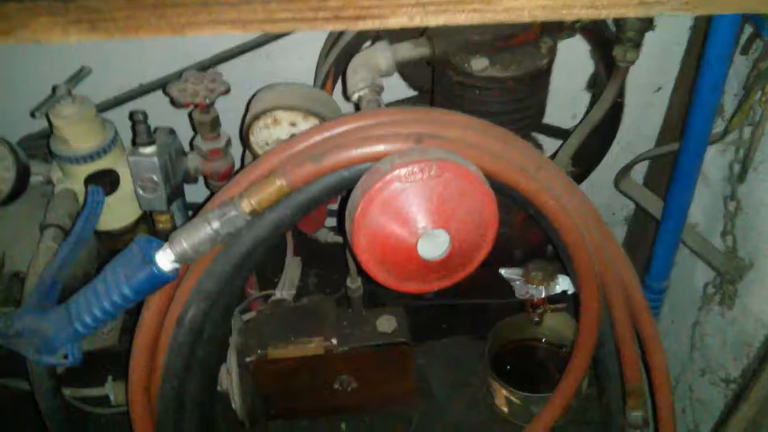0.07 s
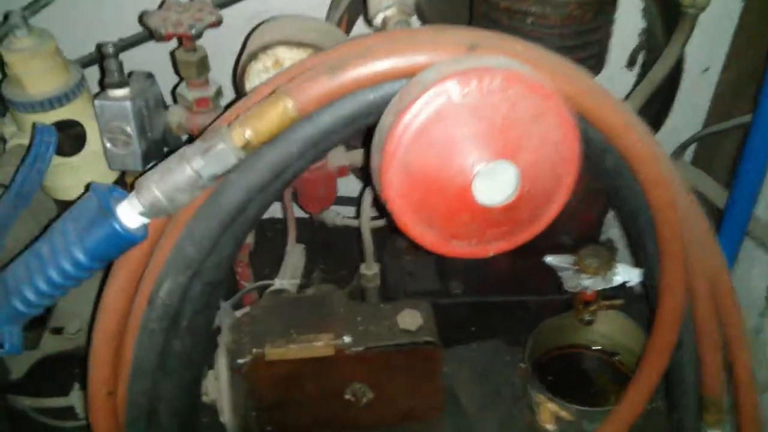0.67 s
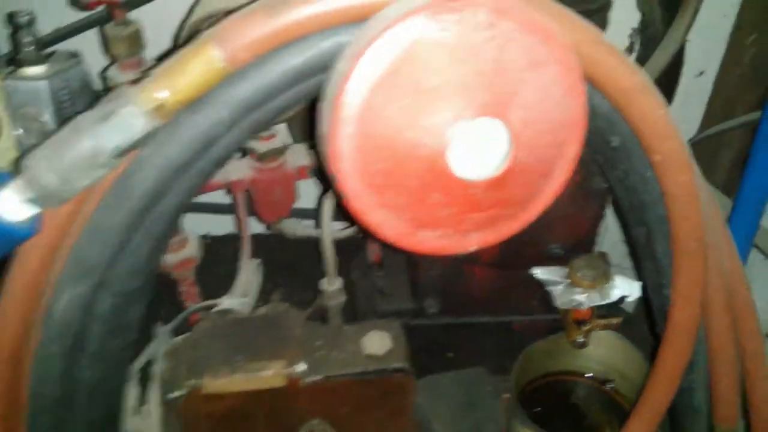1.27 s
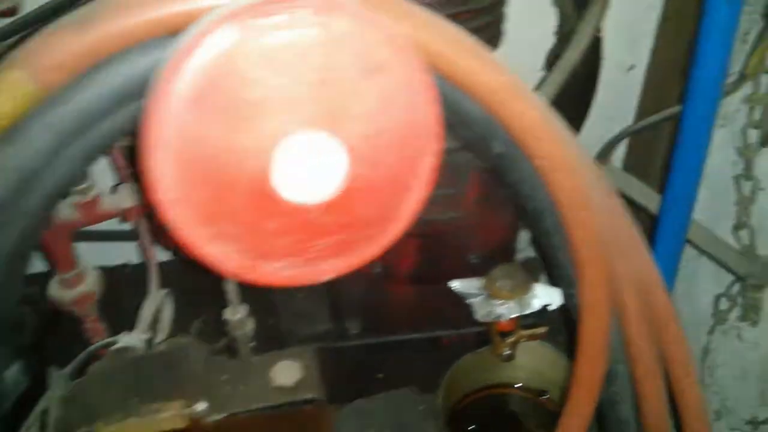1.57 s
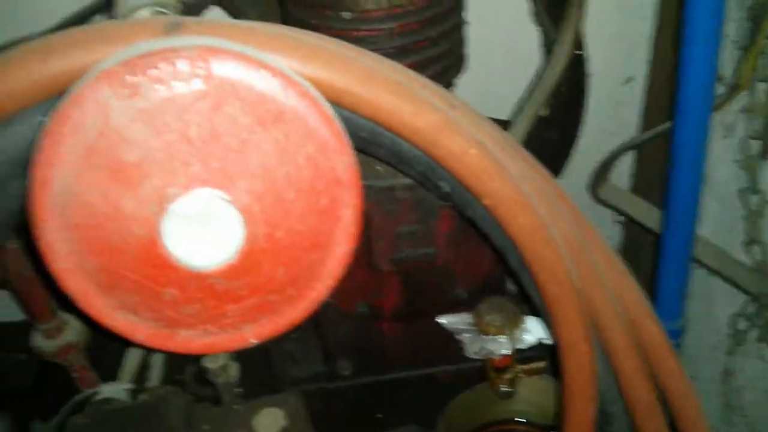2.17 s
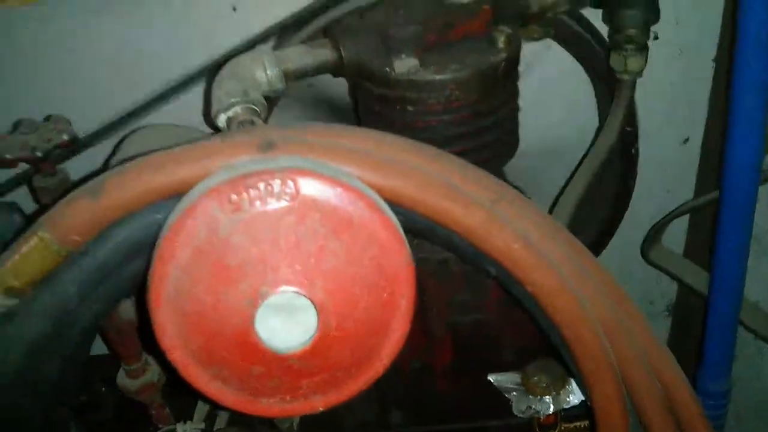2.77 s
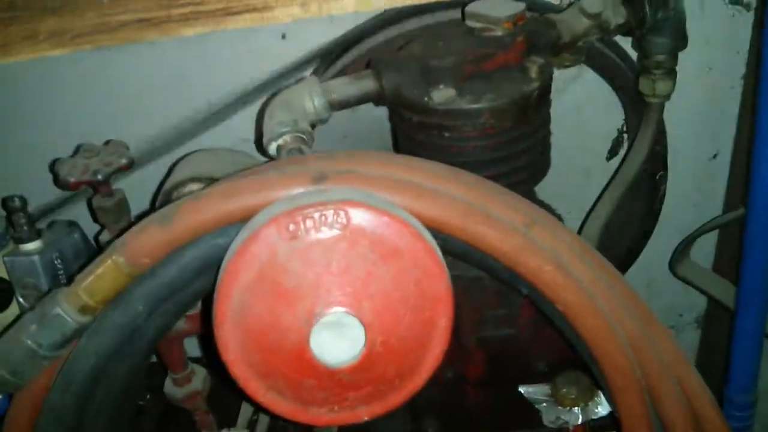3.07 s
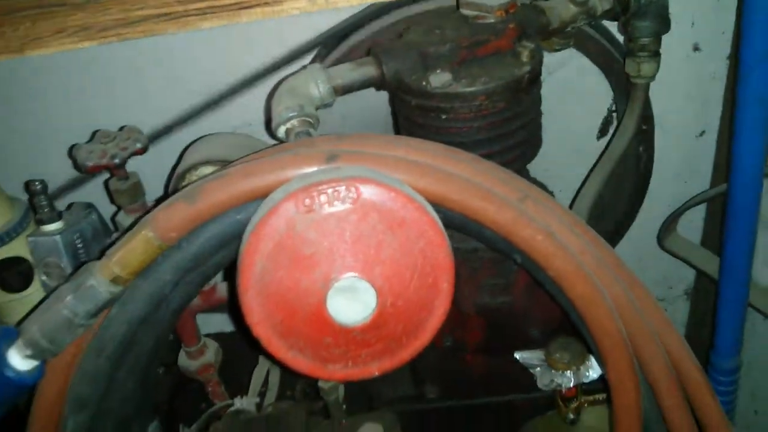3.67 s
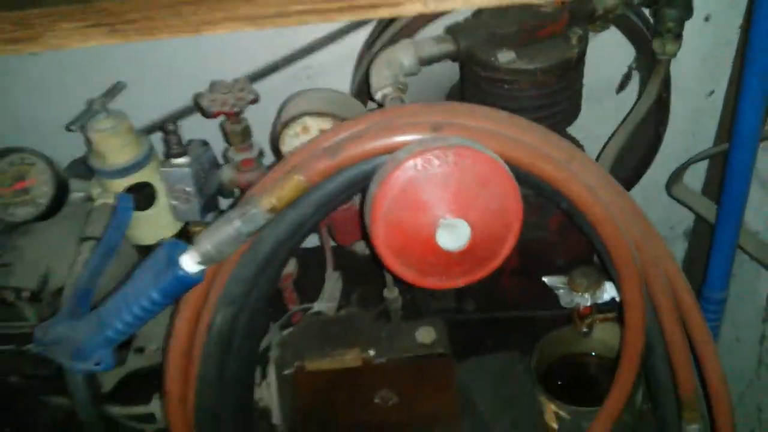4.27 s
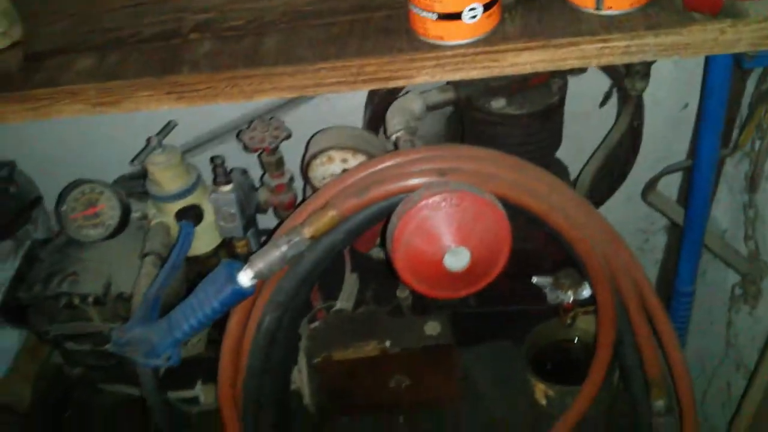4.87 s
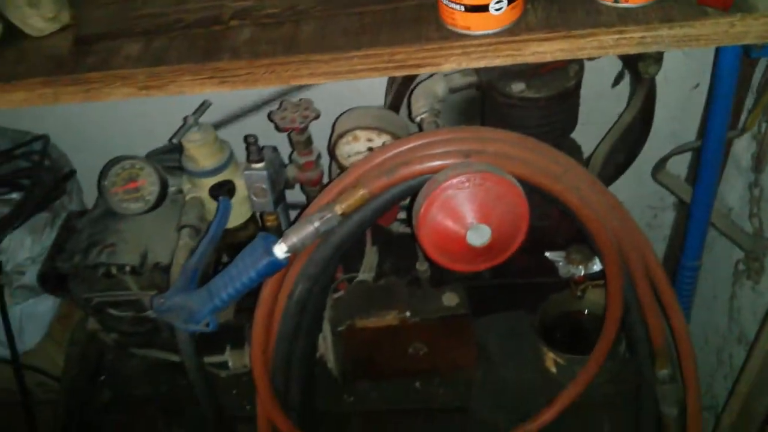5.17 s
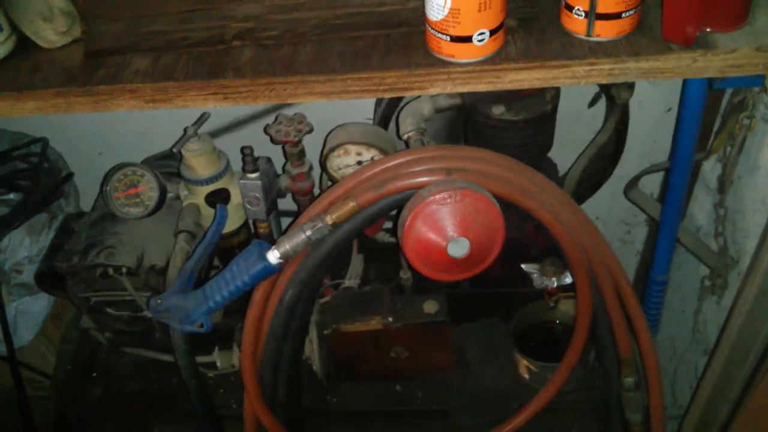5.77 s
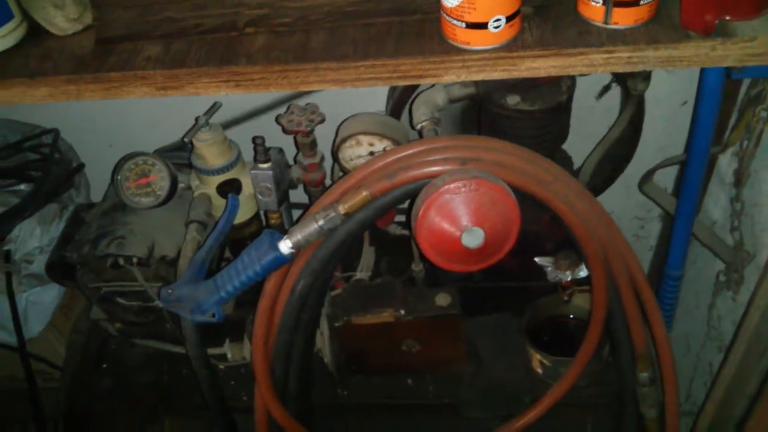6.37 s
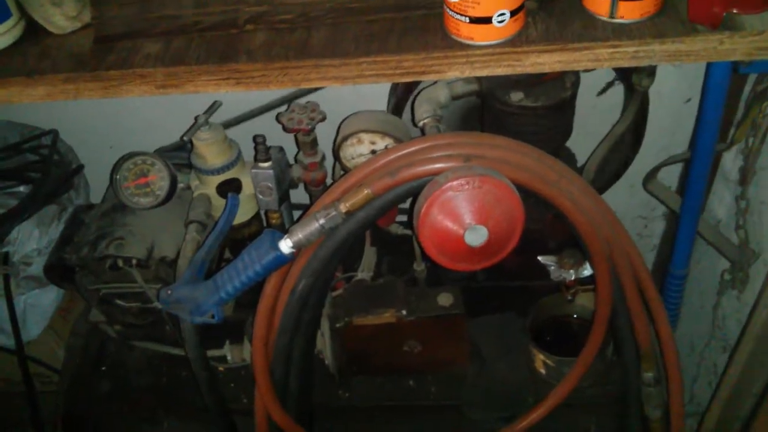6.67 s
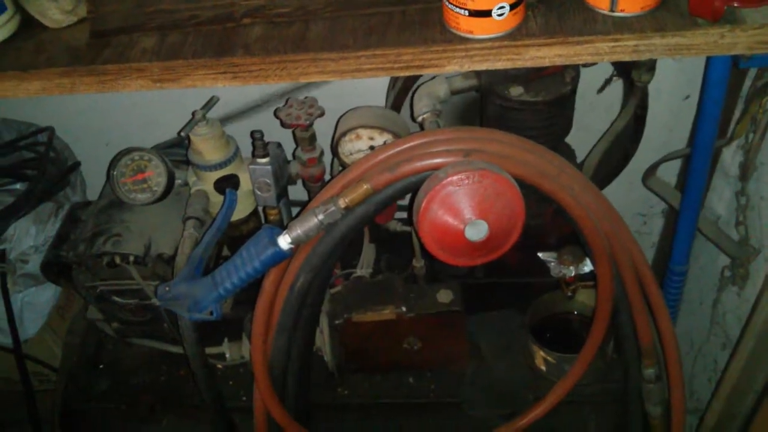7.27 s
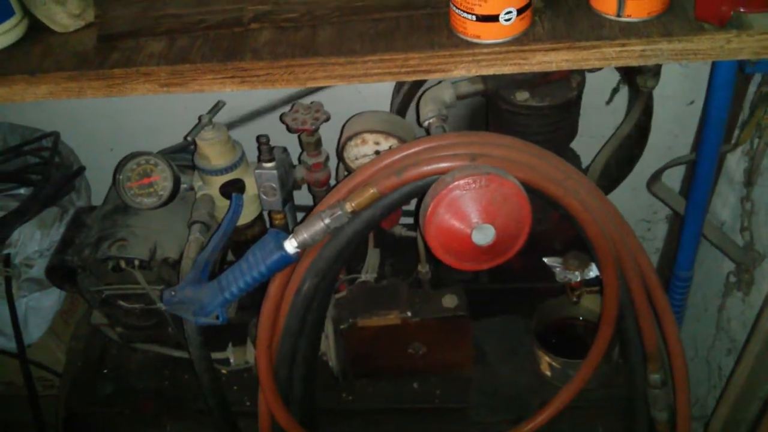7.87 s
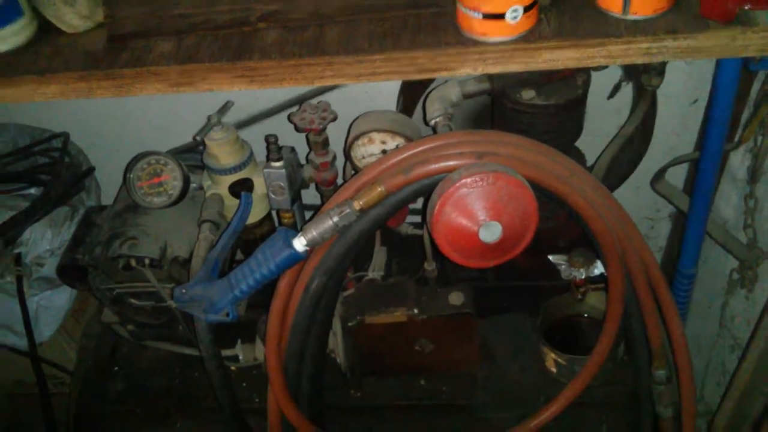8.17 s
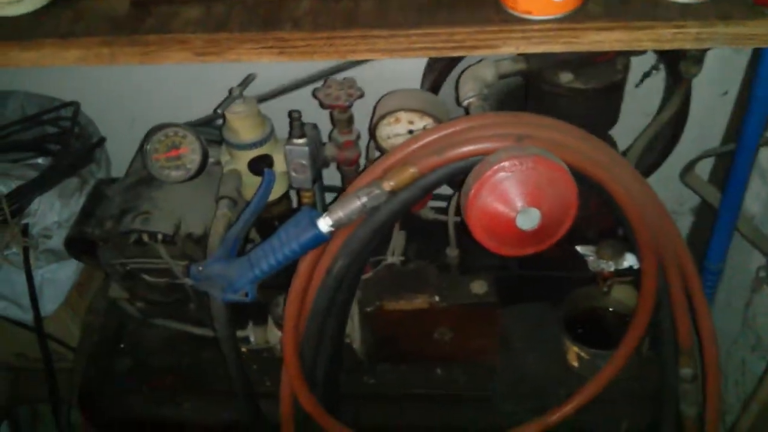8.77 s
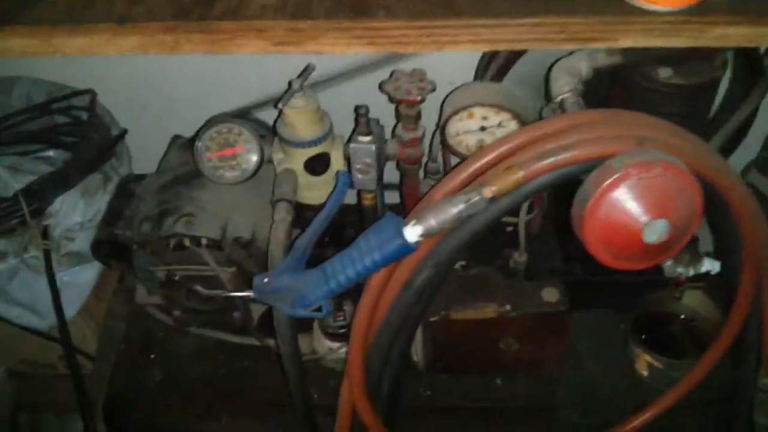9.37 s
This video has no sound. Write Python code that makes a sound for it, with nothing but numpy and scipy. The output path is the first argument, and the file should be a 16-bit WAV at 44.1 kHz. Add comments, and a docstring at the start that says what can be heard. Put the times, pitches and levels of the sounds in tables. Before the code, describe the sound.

An old belt-driven air compressor starts up close by in a small, cluttered workshop. After near quiet with soft ticking come a metallic snap, a straining motor hum, a few jolts and short, high belt squeaks. The machine settles into a loud, pulsing clatter of loose metal, with the pump thumping and hissing eight to nine times a second. It keeps running, a little lighter as the microphone backs away and shifts sideways.

```python
"""An old belt-driven air compressor in a small workshop, the microphone close by, then a step back,
then at the side. Over faint ticking the switch clacks, the motor groans, the slipping belt chirps
and the pump catches. From then on loose metal rattles once a motor turn, while the piston thumps
the tank and the valves slap and hiss eight to nine times a second."""
import sys
import numpy as np
from scipy import signal
from scipy.io import wavfile

SR = 44100
rng = np.random.default_rng(int(sys.argv[2]) if len(sys.argv) > 2 else 0)


def bounce(signal):
    """Save signal as a 16-bit WAV file at the path given by the first command-line argument."""
    frames = np.transpose(np.atleast_2d(signal))
    limited = np.clip(frames, -1, 1)
    pcm = np.round(limited * 32767).astype(np.int16)
    wavfile.write(sys.argv[1], SR, pcm)


N = 419832
T = np.arange(N) / SR
TURN_S, STROKE_S = .034634, .11717  # one motor turn and one pump stroke at full speed
SKIP_AT_S, SKIP_S = 5.4, .0232  # the whole rhythm skips ahead once: when, and by how much

# Resonances of the machine and narrow dips of the microphone. Each row: centre in Hz, width in Hz,
# then height in dB from close by, a step back and the side.
RESONANCES = [(174.4, 50.0, 10, 9, 7.5), (257.7, 55, 9.5, 5.5, 4.5), (407, 71, 11, 2.5, -7),
              (458.6, 25, 6, 7, 5), (499, 22.5, -4, -6, -10), (635, 68, 5.8, 2.1, -5.5),
              (751, 66, 3, 5.2, 1), (913, 94, -1, -5.5, 1.0), (1258, 85, 6.5, 8, 5.5),
              (1378, 66, 10, 10, 1), (1540, 97, 3, 5.5, 0.6), (1616, 84, 7.3, 1.5, 1.5),
              (1825, 100, 5.8, 10, 8.5), (1946, 51, -0.3, 9, 5), (2275, 130, 3, 3.5, 0),
              (2510, 80, -8, -11.5, -21), (2829.0, 91, -10.7, -13, -13.1), (2984, 130, 4.5, 2.5, 4),
              (3157, 77.0, -11, -11, -6), (3493, 71, -12.3, -13.7, -14.4), (3846, 97, -13.4, -13.2, -13.3),
              (3987.0, 180, -0.6, 6.5, -2.9), (4156.0, 136.0, -9, -6.6, -7.5), (4700, 71, 5, 6.5, 0.9),
              (5623.0, 240, 8, 7.3, 5), (5840, 236, 11.6, 8.8, 12), (6154, 256, 10, 9, 11)]
# The microphone's path. Each row: time in seconds, place (0 close by, 1 a step back, 2 at the side).
MIC_PATH = [(4.0, 0.082), (5.1, 0.98), (8.7, 1), (9.15, 2.08)]
# Level of a pump stroke in dB from close by, a step back and the side.
STROKE_BY_PLACE_DB = [-12.6, -15.7, -18.5]
# Snaps of the switch and the tightening drive. Each row: start in seconds, level in dB,
# hold in seconds, seconds to fall 60 dB.
SWITCH_SNAPS = [(2.4487, -6.5, .009, .1), (2.518, -28, .008, 0.02), (2.699, -32, .004, 0.9),
                (2.947, -22, .03, .1), (2.992, -19, .008, .08), (3.043, -14, .004, 0.2)]


def amp(db):
    """Decibels to gain."""
    return 10 ** (np.asarray(db) / 20)


def unit_rms(x):
    """The signal scaled to an rms of one."""
    return x / np.sqrt(np.mean(x ** 2) + 1e-20)


def curve(rows):
    """Rows of time in seconds and value, joined by straight lines."""
    return np.interp(T, *np.transpose(rows))


def add(mix, s, sound):
    """Mixes a sound in at s seconds."""
    part = mix[round(s * SR):][:len(sound)]
    part += sound[:len(part)]


def wander(rate_hz):
    """A random drift of unit rms."""
    return unit_rms(np.interp(2 * rate_hz * T, np.arange(20000), rng.standard_normal(20000)))


def grit(per_s, spread_db):
    """A dense stream of tiny impacts of uneven size."""
    impacts = (rng.random(N) < per_s / SR) * rng.choice([-1, 1], N)
    return unit_rms(impacts * amp(spread_db * rng.standard_normal(N)))


def colour(x, spectrum, peaks=(), size=8192):
    """Causal filter of unit energy: a spectrum (Hz, dB) with peaks (Hz, width in Hz, dB) on top."""
    hz = np.fft.rfftfreq(size, 1 / SR)
    point_hz, point_db = np.transpose(spectrum)
    db = np.interp(np.log(hz + 1), np.log(point_hz + 1), point_db)
    for centre, width, height in peaks:
        db = db + height / (1 + (2 * (hz - centre) / width) ** 2)
    log_gain = np.log(amp(np.r_[db, db[-2:0:-1]]))
    taps = np.fft.ifft(np.exp(np.conj(signal.hilbert(log_gain)))).real[:size // 2]  # minimum phase
    return signal.oaconvolve(x, taps / np.linalg.norm(taps))[:N]


def mic_dips():
    """The narrow dips of the microphone's hollow colour."""
    return [(hz, width, db) for hz, width, db, *_ in RESONANCES if db < 0]


def radiate(x, spectrum):
    """The machine's resonances shift in weight as the microphone moves."""
    place = curve(MIC_PATH)
    hz, width, *heights = np.transpose(RESONANCES)
    return sum(np.maximum(1 - abs(place - k), 0) * colour(x, spectrum, zip(hz, width, db))
               for k, db in enumerate(heights))


def db_at_mic(levels, s):
    """Level where the microphone stands at s seconds, given one level for each place."""
    place = np.interp(s, *np.transpose(MIC_PATH))
    return np.interp(place, np.arange(len(levels)), levels)


def beats(first_s, period_s, lag_s, spin_up_s=.125):
    """Times of a beat that starts slow, loses lag_s in settling to its period and skips ahead once."""
    steady = np.arange(0, T[-1] + period_s - first_s, period_s)
    s = first_s + steady + lag_s * (1 - np.exp(-steady / spin_up_s))
    return s - SKIP_S * (s > SKIP_AT_S)


def stroke_times():
    """One stroke per turn of the pump's flywheel."""
    return beats(first_s=2.812, period_s=STROKE_S, lag_s=.101)


def throw_times():
    """One throw of the loose metal per motor turn."""
    return beats(first_s=3.006, period_s=TURN_S, lag_s=.0425)


def cycles(times, s):
    """How many beats have passed at s seconds."""
    return np.interp(s, times, np.arange(len(times)))


def stroke_swell(swing_db, peak_at):
    """Gain that fades in with the pump and crests once a stroke, peak_at of the way through."""
    swing = np.cos(2 * np.pi * (cycles(stroke_times(), T) - peak_at))
    return np.interp(T, [2.8, 3.0], [0, 1]) * amp(swing_db * swing)


def room_tone(first_tick_s=.168, tick_s=.1334, tick_db=-8, tock_db=-17, top_db=-65):
    """Low room noise and thin hiss; before the start, a faint, even tick-tock and a few tiny clicks."""
    # Swells of the room noise, a soft hiss and the ticking. Each row: time in seconds, level in dB.
    air_swell = [(0.05, -78), (0.2, -55), (1.1, -49), (1.52, -50.5), (1.64, -59), (1.87, -54),
                 (2.05, -59.5), (2.2, -53), (2.42, -55.5)]
    fizz_swell = [(0.05, -82), (0.3, -71), (1.1, -58), (1.5, -64), (1.7, -80)]
    tick_swell = [(.17, -53), (.5, -44), (1.37, -41.5), (1.7, -51), (2.2, -52)]
    # Spectra of the room noise and a tick. Each row: frequency in Hz, relative level in dB.
    air_spectrum = [(18, -35), (45, -5), (86, -8), (118, 4), (150, -11), (230, -14), (400, -23), (700, -29),
                    (900, -25), (1550, -35), (2000, -29), (2900, -43), (5000, -50), (16000, -60)]
    tick_spectrum = [(400, -30), (750, -18), (950, -1), (1400, -14), (2050, 2), (2700, -16), (3600, -3),
                     (4500, -28), (6500, -24), (8000, -13), (10000, -26), (15000, -30)]
    # High clicks just before the switch trips. Each row: start in seconds, level in dB.
    tiny_clicks = [(1.7, -58), (2.274, -57), (2.365, -51)]
    t = np.arange(SR // 10) / SR
    ticks, tocks, clicks = np.zeros((3, N))
    air_noise, fizz_noise, tick_noise, top_noise = rng.standard_normal((4, N))
    for s in np.arange(first_tick_s, tick_swell[-1][0], tick_s):
        tick = amp(np.interp(s, *np.transpose(tick_swell))) * np.exp(-t / .012)
        add(ticks, s, amp(tick_db) * tick)
        add(tocks, s + tick_s / 2, amp(tock_db) * tick)
    for s, db in tiny_clicks:
        add(clicks, s, amp(db) * np.exp(-t / .003))
    air = amp(curve(air_swell)) * colour(air_noise, air_spectrum)
    fizz = colour(fizz_noise, [(1500, -25), (4000, -9), (7500, 0), (11000, -6), (16000, -10)])
    top_gain = amp(top_db) * np.minimum(T / .3, 1) + clicks
    top = colour(top_gain * top_noise, [(2000, -22), (5500, -16), (7800, 0), (11000, -1), (16000, -5)])
    ticking = colour(ticks * tick_noise, tick_spectrum, mic_dips())
    tocking = colour(tocks * tick_noise, [(900, -15), (1500, -18), (2100, 0), (2800, -22), (8000, -30)])
    return air + amp(curve(fizz_swell)) * fizz + top + ticking + tocking


def switch():
    """The contacts snap shut with a short metallic crash; smaller snaps follow as the drive tightens."""
    # Spectrum of a snap. Each row: frequency in Hz, relative level in dB.
    snap_spectrum = [(35, -56), (60, -26), (212, -8), (698, -7), (1010, -12), (1860, -9), (2840, -21),
                     (3670, -17), (3940, -8), (6280, -5.5), (7230, 0.5), (14600, -22), (16000, -28)]
    t, blows = np.arange(SR // 3) / SR, np.zeros(N)
    for s, db, hold, t60 in SWITCH_SNAPS:
        add(blows, s, amp(db - 60 * np.maximum(t - hold, 0) / t60))
    return colour(blows * grit(per_s=6000, spread_db=3), snap_spectrum, mic_dips())


def motor(groan_db=-3, strain_db=-4, hum_db=-36, shaft_db=-41.5, hum_hz=120):
    """A groan under the starting load, then mains hum and a throb at twice the shaft speed."""
    # The motor labouring up to speed. Each row: time in seconds, level in dB.
    labour = [(2.445, -70), (2.46, -32), (2.54, -26), (2.6, -33.5), (2.7, -34), (2.76, -28), (2.9, -25),
              (3.0, -27), (3.2, -60)]
    # Its mains tones and the spectrum of its strain. Each row: frequency in Hz, relative level in dB.
    mains_tones = [(60, -9.5), (120, -12), (240, -3.5), (300, -5), (360, -11), (420, -8), (480, -12),
                   (600, -13)]
    strain_spectrum = [(24, -32), (40, -4), (194, -15), (231, -5), (363, -8), (600, -14), (1040, -33),
                       (1210, -20), (2910, -42), (6020, -29), (16000, -53)]
    groan = sum(amp(db) * (1 + .43 * wander(rate_hz=12)) * np.sin(2 * np.pi * (hz * T + rng.random()))
                for hz, db in mains_tones)
    strain = colour(rng.standard_normal(N), strain_spectrum)
    starting = amp(curve(labour)) * (amp(groan_db) * unit_rms(groan) + amp(strain_db) * strain)
    hum = amp(hum_db) * np.sin(2 * np.pi * hum_hz * T)
    throb = amp(shaft_db) * np.sin(2 * np.pi * 2 * cycles(throw_times(), T))
    switched_on = T > SWITCH_SNAPS[0][0]
    return starting * switched_on + np.sqrt(2) * (hum + throb) * np.interp(T, [2.8, 3.1], [0, 1])


def pump(thud_db=-5.2, clack_db=-3.8, uneven_db=.8, scatter_db=2, jitter_s=.0016):
    """The frame jolts at the start; then each stroke thumps the tank and the valves flutter and slap."""
    # Jolts of the frame as the motor pulls. Each row: start in seconds, level in dB.
    jolts = [(2.458, -32), (2.475, -30), (2.514, -26), (2.522, -23.5), (2.822, -17), (2.848, -18),
             (2.866, -20), (2.878, -20)]
    # Knocks within one stroke. Each row: delay in seconds, dull thud in dB, valve clack in dB.
    knocks = [(.001, 1, -6.5), (.012, -7.5, -12), (.0235, -9.5, -11), (.035, -11, -6), (.043, -16.5, -8.5),
              (.049, -22, -12), (.098, -19, -22), (.107, -14, -17)]
    # Spectra of a thud and a clack. Each row: frequency in Hz, relative level in dB.
    thud_spectrum = [(25, -26), (60, -9), (100, -2), (170, -2.5), (250, -2.5), (330, -3.5), (500, -4),
                     (800, -7.5), (1200, -22), (3000, -56.5)]
    clack_spectrum = [(100, -32), (350, -15), (600, -3), (740, 2), (850, -2.5), (1050, -16), (1400, -28),
                      (4000, -56)]
    thuds, clacks = np.zeros((2, N))
    blow = np.sqrt(.04 * SR)  # one sample with the energy of 40 ms at unit rms
    for s, db in jolts:
        add(thuds, s, [blow * amp(db)])
        add(clacks, s, [blow * amp(db - 3)])
    starts = stroke_times()
    levels = db_at_mic(STROKE_BY_PLACE_DB, starts) + uneven_db * rng.standard_normal(len(starts))
    for s, db in zip(starts, levels):
        for delay, thud, clack in knocks:
            thud_size, clack_size, late = rng.standard_normal(3)
            at = s + delay + jitter_s * late * min(delay / .02, 1)  # the later knocks are less regular
            add(thuds, at, [-blow * amp(db + thud + scatter_db * thud_size / 2)])
            add(clacks, at, [-blow * amp(db + clack + scatter_db * clack_size)])
    return amp(thud_db) * radiate(thuds, thud_spectrum) + amp(clack_db) * radiate(clacks, clack_spectrum)


def frame_boom(hz=312, t60=.26, mount_hz=72, mount_db=-12):
    """The frame booms briefly and rocks on its mounts each time the belt pulls tight."""
    # Tugs of the belt. Each row: start in seconds, level in dB.
    tugs = [(2.516, -19), (2.848, -19)]
    t, booms = np.arange(SR // 2) / SR, np.zeros(N)
    boom = np.sin(2 * np.pi * hz * t) + amp(mount_db) * np.sin(2 * np.pi * mount_hz * t)
    for s, db in tugs:
        add(booms, s, amp(db - 60 * t / t60) * boom)
    return booms


def belt(flank_ratio=1.1, flank_db=-10, octave_db=-22, scrape_db=-16, glide_s=.04):
    """The belt slips on its pulley in rough, gliding chirps; its two flanks squeal a little apart."""
    # Belt chirps. Each row: crest time in seconds, pitch in Hz, glide in Hz per second, level in dB,
    # rise and fall in seconds.
    chirps = [(2.525, 8300, 8000, -20, .008, .005), (2.558, 8400, 8000, -24.5, .005, .009),
              (2.767, 7180, -20000, -9, .007, .007), (2.787, 7700, 42000, -11.5, .006, .006),
              (2.856, 8050, 32000, -4, .006, .009), (2.902, 9200, 30000, -17, .005, .008),
              (2.955, 7800, 28000, -5, .003, .022), (2.974, 6650, -15000, -15, .006, .012)]
    squeals, grip = np.zeros((2, N))
    t = np.arange(-SR // 10, SR // 10) / SR
    waver = .032 * wander(rate_hz=450)
    roughness = unit_rms(1 + .55 * wander(rate_hz=700))
    for s, hz, glide, db, rise_s, fall_s in chirps:
        pitch = (hz + glide * np.clip(t, -glide_s, glide_s)) * (1 + np.interp(s + t, T, waver))
        phase = 2 * np.pi * np.cumsum(pitch) / SR
        flanks = np.sin(phase) + amp(flank_db) * np.sin(flank_ratio * phase)
        swell = amp(db) * 2 / (np.exp(-t / rise_s) + np.exp(t / fall_s))
        add(squeals, s + t[0], swell * unit_rms(flanks + amp(octave_db) * np.sin(2 * phase)))
        add(grip, s + t[0], swell)
    scrape_spectrum = [(300, -8), (1500, 2), (2200, 1), (3000, -9), (6000, -6), (9000, -3), (16000, -1)]
    scrape = colour(rng.standard_normal(N), scrape_spectrum, mic_dips())
    return squeals * roughness + amp(scrape_db) * grip * scrape


def churn(level_db=-26, near_share=.6):
    """Crank, belt and intake air rumble on, swelling with each stroke and louder close to the pump."""
    # Spectrum of the rumble. Each row: frequency in Hz, relative level in dB.
    rumble_spectrum = [(18, -24), (45, -9), (80, -5), (150, -8), (300, -5), (430, 5.5), (620, 3.5),
                       (800, -1), (1200, -8), (3000, -25), (16000, -55)]
    near_db = near_share * (db_at_mic(STROKE_BY_PLACE_DB, T) - np.mean(STROKE_BY_PLACE_DB))
    rumble = stroke_swell(swing_db=1.6, peak_at=.15) * grit(per_s=900, spread_db=3)
    return amp(level_db + near_db) * radiate(rumble, rumble_spectrum)


def valve_hiss(level_db=-38.5):
    """Air forced through the valves hisses with each stroke and whistles faintly."""
    # Spectrum of the hiss. Each row: frequency in Hz, relative level in dB.
    hiss_spectrum = [(2000, -25), (5000, -9), (7000, -3), (8300, 0), (9600, -7), (12000, -9), (16000, -11)]
    flow = stroke_swell(swing_db=6, peak_at=.22) * rng.standard_normal(N)
    return amp(level_db) * colour(flow, hiss_spectrum, peaks=[(8020, 220, 10), (8620, 260, 9)])


def throw_force(s, belt_hz=5.496, slack_db=-5, slip_hz=4.536, slip_db=1.15, load_db=.7):
    """Each throw in dB, shaped by the belt's slack spot, the motor's slip beat and the pump's load."""
    # Level of a throw in dB from close by, a step back and the side.
    throw_by_place_db = [-9.8, -11.2, -11.3]
    # Throws that land hard or nearly miss. Each row: time in seconds, dB above the usual.
    odd_throws = [(3.094, 3), (3.135, 3.6), (3.322, -4), (3.776, -4), (4.399, 3.3), (4.988, 4.5),
                  (5.334, 4), (5.623, 2.5), (6.939, 2.5), (7.043, -3), (7.077, -6), (7.285, -3.5),
                  (7.943, -5), (8.013, -10), (8.047, -3), (8.497, 4.3), (8.74, -4), (8.948, -5),
                  (9.19, 3.3), (9.398, -4)]
    machine_s = s + SKIP_S * (s > SKIP_AT_S)
    from_slack_s = (((machine_s - 3.098) * belt_hz + .5) % 1 - .5) / belt_hz  # it passes once a lap
    db = db_at_mic(throw_by_place_db, s) + slack_db * np.exp(-(from_slack_s / .008) ** 2)
    db += slip_db * np.cos(2 * np.pi * slip_hz * (machine_s - 3.101))
    db += load_db * np.cos(2 * np.pi * (cycles(stroke_times(), s) - .25))
    return db + sum(extra * (abs(s - at) < TURN_S / 2) for at, extra in odd_throws)


def rattle(level_db=-.7, edge_db=-15.5, rest_db=-33, rise_s=.0009, hold_s=.012, fall_db_per_s=1200):
    """Once a turn loose metal is thrown into chatter that holds and dies; hard throws are brighter."""
    # Spectra of the chatter and the edge of hard blows. Each row: frequency in Hz, relative level in dB.
    chatter_spectrum = [(200, -30.5), (600, -15), (1000.0, -9.5), (1400.0, -7.5), (2000.0, -10.5),
                        (2700.0, -11.5), (4000.0, -9.5), (5200.0, -8.6), (6800.0, -12.5), (8500.0, -15),
                        (11000.0, -20.8), (15500.0, -26)]
    edge_spectrum = [(1000, -20), (2500, -8), (4500, 0), (7000, -3.5), (11000, -7.5), (16000, -13)]
    starts = throw_times()
    force_db = throw_force(starts)
    t = np.arange(SR // 10) / SR
    power, edge = np.zeros((2, N))
    for start, db in zip(starts, force_db):
        size, length, late, sharp = rng.standard_normal(4)
        at = start + .0005 * late
        dying_db = fall_db_per_s * np.maximum(t - hold_s * np.exp(.23 * length), 0)
        throw = np.minimum(t / rise_s, 1) * amp(db + 1.1 * size - dying_db)
        add(power, at, throw ** 2)
        add(edge, at, throw * amp(db - force_db.mean() + 3 * sharp))
    power += (T > starts[0]) * amp(rest_db) ** 2  # faint chatter between throws
    chatter = np.sqrt(power) * grit(per_s=6000, spread_db=2.5)
    sharpness = colour(edge * grit(per_s=3000, spread_db=3.6), edge_spectrum, mic_dips())
    return amp(level_db) * radiate(chatter, chatter_spectrum) + amp(edge_db) * sharpness


def pipe_ring(x, level_db=-4, t60=.14):
    """Pipes and guard keep ringing from one throw to the next."""
    # Their long, thin modes, each a frequency in Hz.
    modes_hz = [1245, 1385, 1502, 1940, 2277, 3020, 3284, 3644, 3962, 4689, 5821, 5903, 6113, 7977, 8646]
    t = np.arange(SR // 5) / SR
    dying = amp(-60 * t / t60)
    modes = sum(np.cos(2 * np.pi * hz * t) for hz in modes_hz) * 2 * dying / dying.sum()
    return x + amp(level_db) * signal.oaconvolve(x, modes)[:N]


def workshop(x, wet_db=-12, t60=.21, echoes_per_s=2000):
    """Short, sparse reflections off the cluttered walls reach the microphone after the direct sound."""
    t = np.arange(SR // 2) / SR
    echoes = (rng.random(len(t)) < echoes_per_s / SR) * rng.choice([-1, 1], len(t))
    taps = echoes * (t > .004) * amp(-60 * t / t60)
    return x + amp(wet_db) * signal.oaconvolve(x, taps / np.linalg.norm(taps))[:N]


def scene():
    """The compressor in its workshop, over the room tone, on one microphone."""
    running = pipe_ring(rattle()) + pump() + churn() + valve_hiss()
    machine = running + motor() + switch() + frame_boom() + belt()
    return (workshop(machine) + room_tone())[None]


def record(dry, ceiling=.72, cutoff_hz=16300):
    """The microphone rounds off the loudest peaks; the highest treble is then cut."""
    rounded = ceiling * np.tanh(dry / ceiling)
    lowpass = signal.firwin(401, cutoff_hz, window=("kaiser", 9), fs=SR)
    return signal.oaconvolve(rounded, lowpass[None], "same")


dry = scene()
out = record(dry)
bounce(out)
```